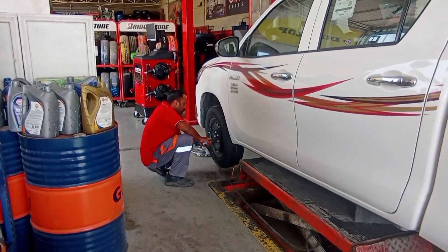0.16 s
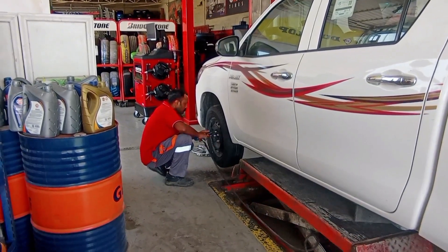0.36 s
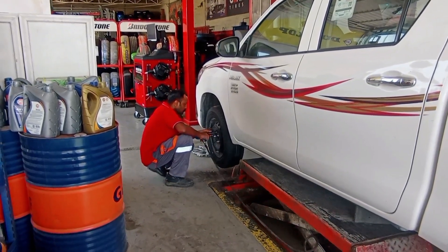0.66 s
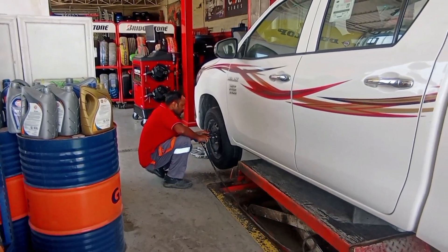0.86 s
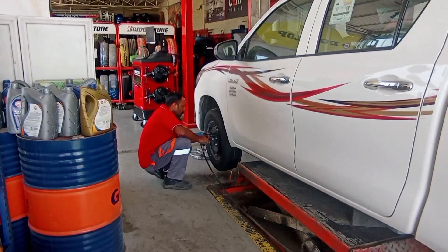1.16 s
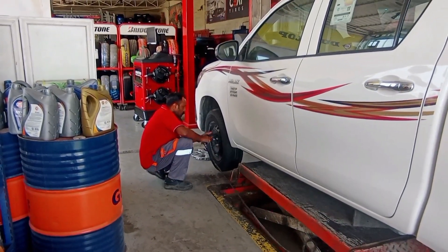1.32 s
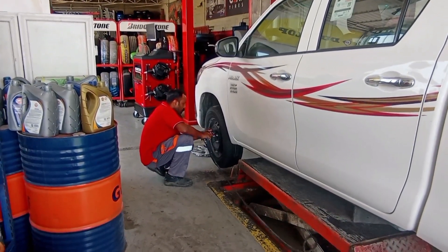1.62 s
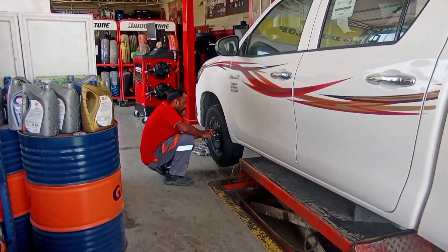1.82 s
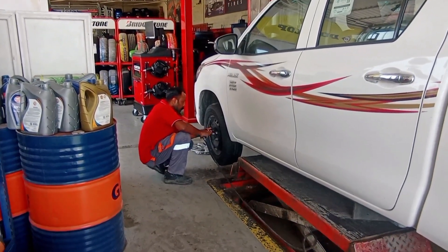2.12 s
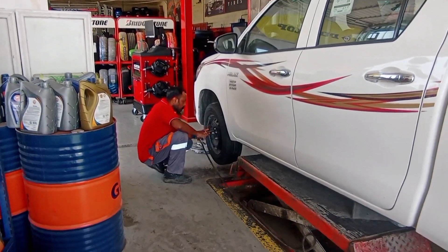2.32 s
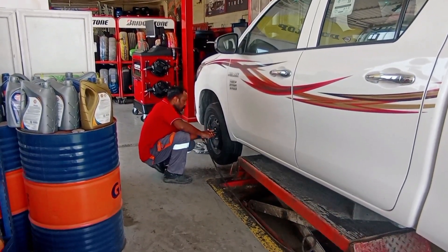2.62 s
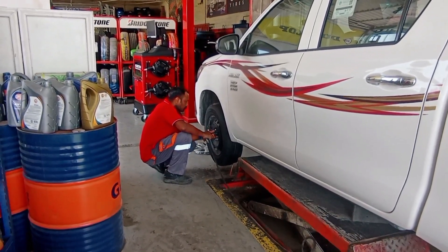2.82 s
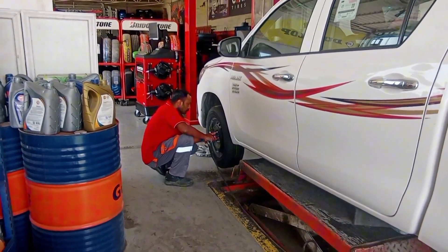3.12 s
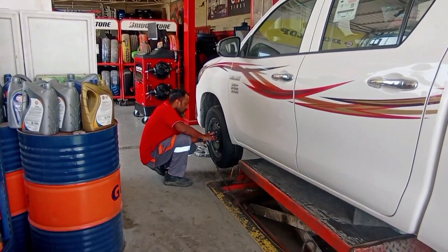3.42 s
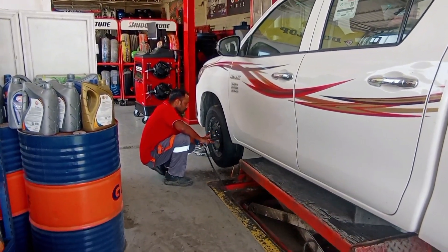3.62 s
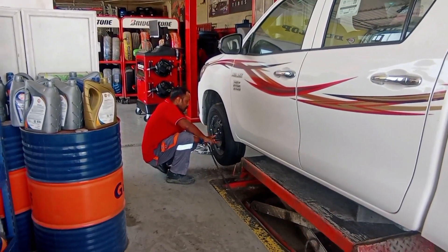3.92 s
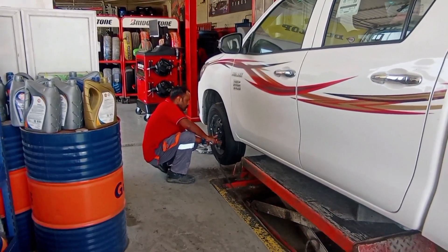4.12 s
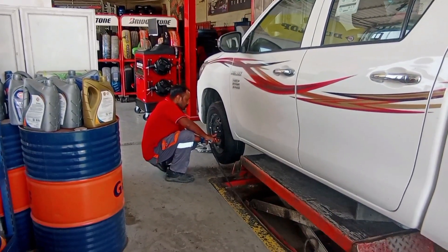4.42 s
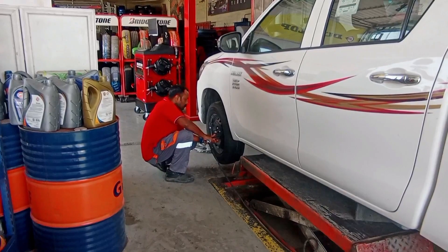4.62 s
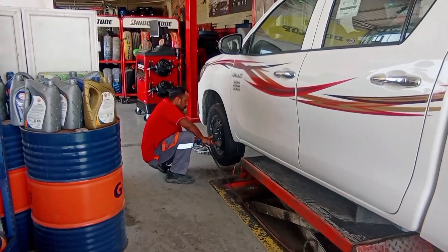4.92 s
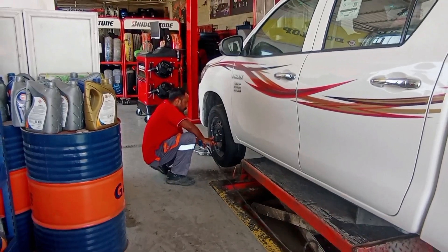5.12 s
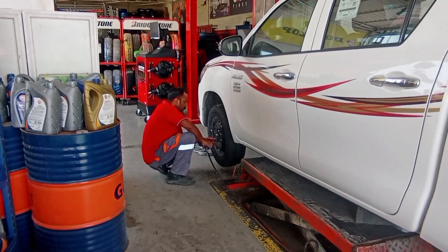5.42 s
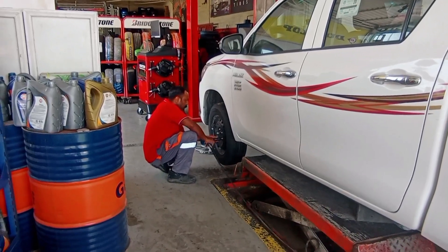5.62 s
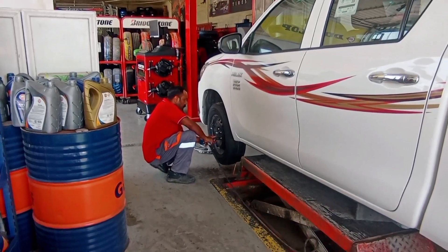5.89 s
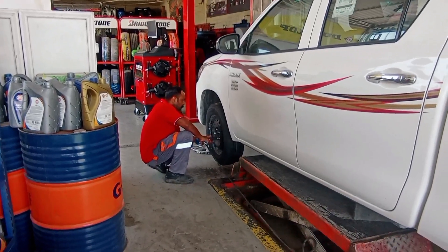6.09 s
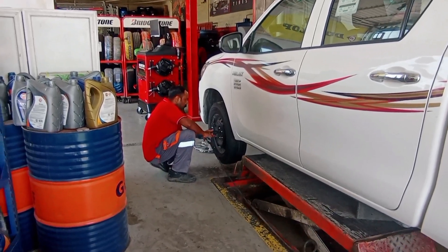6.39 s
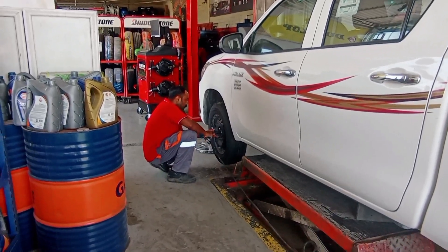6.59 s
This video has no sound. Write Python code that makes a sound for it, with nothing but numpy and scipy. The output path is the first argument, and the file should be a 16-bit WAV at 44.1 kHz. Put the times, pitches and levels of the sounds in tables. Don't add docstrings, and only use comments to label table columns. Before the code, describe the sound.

In a large echoing workshop, an air wrench a few metres away finishes a burst, pauses with soft socket knocks, then makes three longer runs of hard rapid hammering. Each opens with an air rush and motor spin-up, and leaves steel ringing. A short run and a few last blows follow, over a hissing air leak and a low steady drone.

```python
import sys
import numpy as np
from scipy import signal
from scipy.fft import rfft, irfft, next_fast_len
from scipy.io import wavfile
from scipy.ndimage import uniform_filter1d

SR = 44100
rng = np.random.default_rng(int(sys.argv[2]) if len(sys.argv) > 2 else 0)


def field_ratio(decibels):
    return 10 ** (np.asarray(decibels, dtype=float) / 20)


def int16_out(signal):
    q = np.round(np.clip(np.atleast_2d(signal).T, -1, 1) * 32767)
    wavfile.write(sys.argv[1], SR, q.astype(np.int16))


N = 297675
LEAD = SR // 4


def evened(x):
    return x / np.sqrt(np.mean(x ** 2) + 1e-20)


def read(points, hz):
    f, value = np.transpose(points)
    return np.interp(np.log(hz + 1), np.log(f + 1), value)


def add(mix, start_s, sound):
    part = mix[..., max(round(start_s * SR) + LEAD, 0):][..., :sound.shape[-1]]
    part += sound[..., :part.shape[-1]]


def curve(rows):
    s, *columns = np.transpose(rows)
    t = np.arange(s[0], s[-1], 1 / SR)
    return [np.interp(t, s, c) for c in columns]


def swell(start_s, loudest_s, end_s, level_db):
    faint_db = level_db - 21.5
    return curve([(start_s, faint_db), (loudest_s, level_db), (end_s, faint_db)])[0]


def smoothed(x, width):
    return uniform_filter1d(uniform_filter1d(x, width), width)


def flutter(size, depth_db, width):
    return field_ratio(depth_db * evened(smoothed(rng.standard_normal(size), int(width))))


def coloured(x, points):
    size = next_fast_len(x.shape[-1])
    gain = field_ratio(read(points, np.fft.rfftfreq(size, 1 / SR)))
    return irfft(rfft(x, size) * gain, size)[..., :x.shape[-1]]


# pitch_hz, likeness (1 = identical)
LIKENESS = [(60, 0.92), (180, 0.99), (550, 0.69), (1650, -0.18), (4970, 0.0), (15000, -0.01)]


def noise(size, shape, unlike):
    frames, hz = size // 128 + 5, np.fft.rfftfreq(512, 1 / SR)[:, None]
    a, b, c, d = rng.standard_normal((frames, len(hz), 4)).T
    same = np.clip(1.03 * read(LIKENESS, hz) - unlike, .1, .99)
    left = a + 1j * b
    right = same * left + np.sqrt(np.clip(1 - same ** 2, 0, 1)) * (c + 1j * d)
    z = np.array([left, right]) * field_ratio(shape(hz, np.arange(frames) * 128 / SR))
    return evened(signal.istft(z, nperseg=512, noverlap=384)[1][:, :size])


RIM_HZ = [2540, 2965, 3230, 3570, 4151, 4339, 4500, 4710, 4974, 5470, 5700, 6300, 6520, 7020]
# level_db, t60_s
RIM_RINGS = [(-19.5, 0.21), (-22, 0.19), (-25, 0.13), (-36, 0.27), (-21.5, 0.33), (-16, 0.25),
             (-19.5, 0.27), (-28, .3), (-24, 0.38), (-28, 0.23), (-18.5, 0.31), (-16, 0.11), (-31, 0.16),
             (-49, 0.17)]
# pitch_hz, level_db
STRIKE_COLOUR = [(35, -42), (70, -20), (139, -4), (363, -11.5), (480, -5.5), (621, -20.5), (1220, -14.5),
                 (1800, -11.5), (2050, -4.5), (2900, -4.5), (4700, -4), (7300, 0), (10500, -1.5),
                 (16000, -12)]


def strike_steel(rows, crack_s, clatter_s, clatter_db, ring_db):
    mix = np.zeros((2, N + LEAD))
    t, long = np.arange(SR // 8) / SR, np.arange(SR // 2) / SR
    hz = np.array(RIM_HZ)[:, None]
    mode_db, t60_s = np.transpose(RIM_RINGS)[:, :, None]
    damping = 1.5
    modes = field_ratio(mode_db + ring_db - 60 * damping * long / t60_s) * np.exp(2j * np.pi * hz * long)
    burst = np.exp(-t / crack_s) + field_ratio(clatter_db) * np.exp(-t / clatter_s)
    burst = burst * (1 - np.exp(-t / 0.0012))
    ping_shape = np.exp(-t / 0.0018) * (1 - np.exp(-t / 0.00073))
    thud_shape = np.exp(-t / 0.024) * (1 - np.exp(-t / 0.0053))
    for start_s, peak_db, ping_hz, thud_db in rows:
        grit = rng.standard_normal((3, len(t)))
        grit = 0.56 * grit[0] + 0.86 * grit[1:]
        ping = field_ratio(-7.5) * np.sin(2 * np.pi * ping_hz * t) * ping_shape
        thud = field_ratio(thud_db - 28) * evened(uniform_filter1d(grit[0], 40)) * thud_shape
        hub_hz, panel_hz = 1150 * rng.uniform(0.827, 1.178), 145 * rng.uniform(0.926, 1.066)
        hub = field_ratio(-11.5) * np.sin(2 * np.pi * hub_hz * t) * np.exp(-t / 0.0029)
        panel = field_ratio(thud_db - 36.5) * np.sin(2 * np.pi * panel_hz * t) * np.exp(-t / 0.032)
        add(mix, start_s, field_ratio(peak_db) * (grit * burst + ping + thud + hub + panel))
        chance = rng.random((2, len(hz)))
        excite = field_ratio(-12 * chance[0]) * np.exp(2j * np.pi * chance[1])
        detune_hz = 12 * rng.uniform(-1, 1)
        ring = (excite @ modes * np.exp(2j * np.pi * detune_hz * long)).real
        add(mix, start_s, field_ratio(peak_db) * ring)
    return field_ratio(2.8) * coloured(mix, STRIKE_COLOUR)


# first_s, last_s, late_ms (at mid-run), peak_db, thud_db (relative)
RUNS = [
    (-.235, .0599, 0, -6, 3),
    (1.5323, 2.1436, 3, -7, 4),
    (2.808, 3.4544, -1, -4.5, -3),
    (4.1197, 4.6236, -4, -5, -1),
    (5.6779, 6.014, -1, -6, 4),
    (6.6852, 6.7351, 2, -5.5, 3),
]
HARDEN_DB = [1, 4.5, 5, 2, 1, 0]


def run_blows():
    rows, gap_s, scatter_ms = [], .05, .8
    for (first, last, late_ms, peak_db, thud_db), harden_db in zip(RUNS, HARDEN_DB):
        along = np.linspace(0, 1, round((last - first) / gap_s) + 1)
        slip, force, jolt, place = rng.uniform(-1, 1, (len(along), 4)).T
        drift_s = (late_ms + scatter_ms * slip) * np.sin(np.pi * along) / 1000
        start_s = first + (last - first) * along + drift_s
        ping_hz = 6180 + (8430 - 6180) * (place + 1) / 2
        easing_db = -2 * (along == 1)
        blow_db = peak_db + harden_db * (along - .5) + 1.2 * force + easing_db
        rows += zip(start_s, blow_db, ping_hz, thud_db - 6 * (along - .5) + 4 * jolt)
    return rows


# start_s, peak_db, ping_hz, thud_db (relative)
CATCHES = [
    (1.3265, -11.5, 9300, 9),
    (1.3863, -8, 7300, 6),
    (2.6618, -11.5, 9120, 10),
    (3.9711, -7.5, 8660, -9),
    (6.5207, -9.5, 7500, 9),
]


def hammering():
    return strike_steel(run_blows() + CATCHES, crack_s=0.0042, clatter_s=0.018, clatter_db=-13, ring_db=-14)


# pitch_hz, level_db
RUSH_COLOUR = [(150, -17.5), (450, -4), (600, -16.5), (900, -11.5), (1400, -9), (2850, -5), (3700, -8),
               (5000, -7.5), (6500, -3), (7530, 1), (10100, 2.5), (13200, -3), (16000, -3)]
# opens_s, rush_db (first), seated_db (as the nut seats), final_db (at release)
PULLS = [
    (-.25, -35, -33, -22.5),
    (1.278, -21, -27, -21),
    (2.605, -19.5, -25, -25),
    (3.915, -23, -24, -20),
    (5.644, -17, -28, -22),
    (6.468, -22.5, -25, -24),
]


def exhaust():
    level, closed_db = np.zeros(N + LEAD), -55
    for (opens, rush_db, seated_db, final_db), (first, last, *_) in zip(PULLS, RUNS):
        release = last + 0.013
        rows = [(opens, closed_db), (opens + 0.013, rush_db - 4.5), (opens + 0.034, rush_db),
                (max(first, opens + .055), seated_db), (release, final_db), (release + .022, closed_db)]
        add(level, opens, field_ratio(curve(rows)[0]))
    wobble = flutter(len(level), 2.5, 60)
    return level * wobble * noise(len(level), lambda hz, t: read(RUSH_COLOUR, hz) + 0 * t, 0.14)


# start_s, loudest_s, end_s, pitch_hz, level_db
WHISTLES = [
    (1.3, 1.39, 1.48, 13100, -22),
    (2.05, 2.22, 2.58, 13000, -38),
    (2.59, 2.66, 2.9, 12950, -36),
    (3.38, 3.496, 3.59, 5100, -18.5),
    (3.92, 3.96, 4.15, 13100, -24),
    (6.479, 6.52, 6.8, 13000, -22),
]


def whistles():
    mix = np.zeros((2, N + LEAD))
    for start, loudest, end, hz, db in WHISTLES:
        db = swell(start, loudest, end, db)
        a, b = smoothed(rng.standard_normal((2, 2, len(db))), 30)
        carrier = np.exp(2j * np.pi * hz * np.arange(len(db)) / SR)
        add(mix, start, field_ratio(db) * evened(((a + 1j * b) * carrier).real))
    return mix


def wavering(hz, db, slip_db):
    turn = 2 * np.pi * np.cumsum(hz * flutter(len(db), slip_db, 160)) / SR
    tone = np.sin(turn) + field_ratio(-13) * np.sin(2 * turn)
    return 1.16 * field_ratio(db) * tone * flutter(len(db), 14 * slip_db, 270) * signal.windows.tukey(len(db), .15)


# start_s, end_s, first_hz, top_hz, level_db
SPINS = [
    (1.29, 1.41, 190, 425, -34.5),
    (2.615, 2.8, 200, 463, -38),
    (3.922, 4.111, 120, 460, -36),
    (6.478, 6.68, 140, 476, -37),
]


def vane_whine():
    mix, spin_up_s = np.zeros(N + LEAD), .042
    for start, end, first_hz, top_hz, db in SPINS:
        t = np.arange(0, end - start, 1 / SR)
        vane_hz = top_hz + (first_hz - top_hz) * np.exp(-t / spin_up_s)
        add(mix, start, wavering(vane_hz, db + 0 * t, .2))
    return mix


# start_s,
# loudest_s, end_s, pitch_hz, level_db
BOOMS = [(.4, .45, .5, 103, -44), (1.46, 1.5, 1.59, 145, -25), (1.68, 1.84, 2.05, 130, -32.5),
         (4.25, 4.56, 4.68, 137, -32), (1.36, 1.46, 1.52, 355, -33), (1.46, 1.53, 1.595, 476, -33),
         (2.6, 2.63, 2.7, 330, -32), (5.63, 5.66, 5.72, 66, -37), (5.63, 5.72, 5.85, 210, -33),
         (5.59, 5.635, 5.69, 871, -40)]


def booms():
    mix = np.zeros(N + LEAD)
    for start, loudest, end, hz, db in BOOMS:
        add(mix, start, wavering(hz, swell(start, loudest, end, db), .06))
    return mix


# start_s, loudest_s, end_s, pitch_hz, level_db
SINGING = [(2.04, 2.19, 2.56, 13000, -27.5), (3.44, 3.5, 3.85, 12900, -26), (.1, .25, .34, 4290, -38),
           (-.1, .03, .13, 4290, -31), (-.05, .04, .3, 3570, -34), (1.45, 1.65, 2.45, 4337, -32.5),
           (2.699, 3.36, 3.8, 2960, -31.5), (4.2, 4.6, 4.7, 2980, -34), (3.41, 3.5, 3.7, 4960, -28),
           (3.42, 3.48, 3.59, 4390, -24), (4.57, 4.68, 4.7, 4500, -39), (5.98, 6.09, 6.19, 4370, -28),
           (3.78, 3.92, 4, 2720, -40)]


def singing():
    mix = np.zeros(N + LEAD)
    for start, loudest, end, hz, db in SINGING:
        db = swell(start, loudest, end, db)
        waver = flutter(len(db), 3.5, 150)
        add(mix, start, field_ratio(db) * waver * np.sin(2 * np.pi * hz * np.arange(len(db)) / SR))
    return mix


# start_s, peak_db, ping_hz, thud_db (relative)
KNOCKS = [
    (.375, -27.5, 11000, -7),
    (.452, -26, 6900, -13),
    (1.255, -32, 9000, -5),
    (2.451, -22, 13000, -5),
    (2.48, -34, 12900, -8),
    (3.49, -8, 5640, 2),
    (4.098, -9.5, 7290, 6),
]


def knocks():
    return strike_steel(KNOCKS, crack_s=0.0011, clatter_s=0.016, clatter_db=-12.5, ring_db=-17)


# pitch_hz, t60_s
HALL_DECAY = [(100, 0.48), (400, 0.58), (1000, 0.48), (3000, 0.95), (7000, 0.63), (12000, 0.39),
              (16000, 0.34)]


def hall(x):
    wet, t = 0, np.arange(x.shape[1]) / SR
    shift_hz = 2.3
    for path in range(3):
        tail = noise(SR, lambda hz, t: -60 * t / read(HALL_DECAY, hz), .01)
        tail = tail * np.clip(np.arange(SR) / SR / 0.0088 - .3, 0, 1)
        tail = tail / np.linalg.norm(tail[0])
        share = np.sqrt(2 / 3) * np.cos(np.pi * (shift_hz * t + path / 3))
        wet = wet + signal.fftconvolve((share * x.mean(0))[None], tail, axes=1)[:, :x.shape[1]]
    return wet


# start_s, level_db, brightness_db_per_octave
LEAK = [(0, -35, 9), (.4, -46.5, -3), (.65, -54.5, 1.5), (1.25, -50, -4), (2.3, -46, -2), (2.6, -45, -1),
        (3.7, -28, 1), (3.9, -31, -2.5), (4.85, -33.5, -2), (5.62, -32.5, -2), (6.15, -26.5, 3),
        (6.3, -28.5, 3.5), (6.75, -27.5, 2.5)]
# pitch_hz, level_db
FIZZ_COLOUR = [(410, -47), (700, -32), (1000, -11.5), (1400, -15), (2130, -4.5), (2770, -5), (5610, -3),
               (7490, 0), (11000, -2.5), (16000, -12)]


def leak():
    s, db, bright_db = np.transpose(LEAK)

    def colour(hz, t):
        return read(FIZZ_COLOUR, hz) + np.interp(t, s, bright_db) * np.log2(hz / 6000 + .05)

    fizz = noise(N, colour, .01)
    return field_ratio(np.interp(np.arange(N) / SR, s, db)) * fizz * flutter(N, 0.53, 440)


# pitch_hz, level_db
DRONE_COLOUR = [(20, -28), (50, -12.5), (90, -3), (200, -1), (400, -5.5), (600, -13.5), (1200, -20.5),
                (2500, -21), (4000, -28.5), (7000, -26), (12000, -33), (16000, -32)]


def drone():
    hum = coloured(noise(N, lambda hz, t: 0 * hz * t, 0.016), DRONE_COLOUR)
    return field_ratio(-39) * evened(hum) * flutter(N, 1.13, 3500)


def scene():
    steel = hammering() + knocks()
    air = exhaust() + whistles()
    tones = vane_whine() + booms() + singing()
    wet = hall(field_ratio(3.5) * steel + field_ratio(-1.0) * air + field_ratio(-8.5) * tones)
    return (steel + air + tones + wet)[:, LEAD:] + leak() + drone()


def band_limit(x):
    return signal.sosfilt(signal.butter(12, 16730, fs=SR, output="sos"), x)


# pitch_hz, left_minus_right_db
PORT_TILT = [(60, 0), (110, -0.5), (200, 0.5), (380, -1.5), (700, 0.5), (1290, -4), (2380, -6), (4400, -6),
             (8120, -4.5), (15000, 2)]


def record(dry):
    left = coloured(dry[0], [(hz, db / 2) for hz, db in PORT_TILT])
    right = coloured(dry[1], [(hz, -db / 2) for hz, db in PORT_TILT])
    hz = np.fft.rfftfreq(N, 1 / SR)
    late_s = 12.3 / SR * np.clip((hz - 250) / 900, 0, 1)
    right = irfft(rfft(right) * np.exp(-2j * np.pi * hz * late_s), N)
    ports = np.clip([left, right], -.9, .9)
    low_pass = signal.firwin(511, 15780, window=("kaiser", 9), fs=SR)
    return band_limit(signal.oaconvolve(ports, low_pass[None], "same"))


dry = scene()
out = record(dry)
int16_out(out)
```